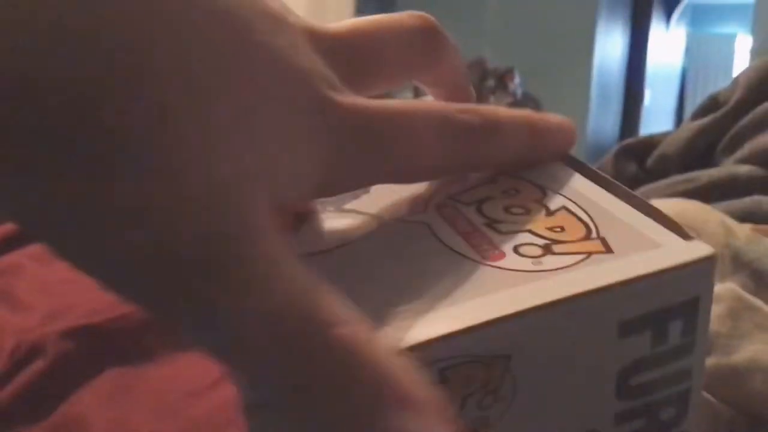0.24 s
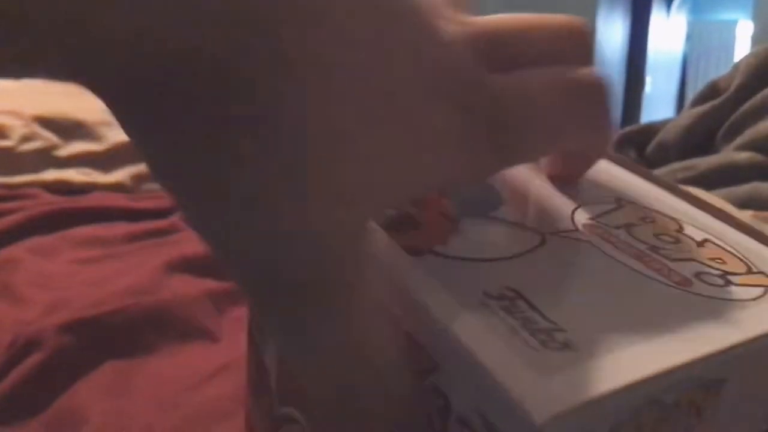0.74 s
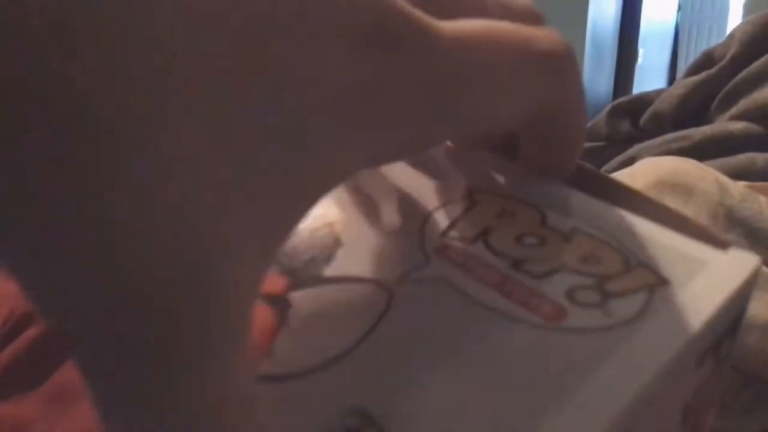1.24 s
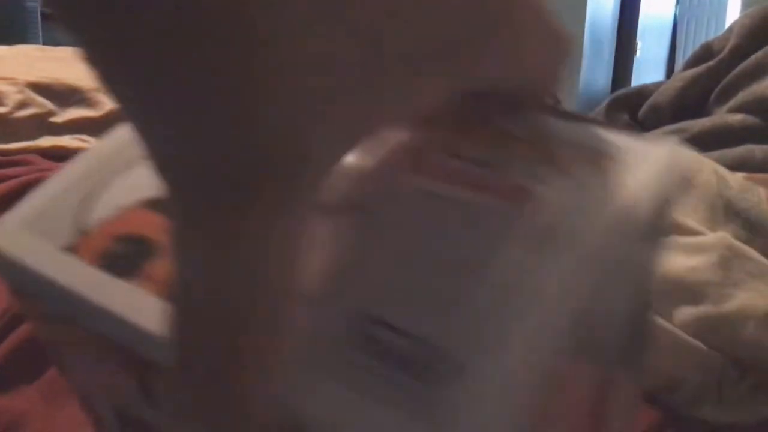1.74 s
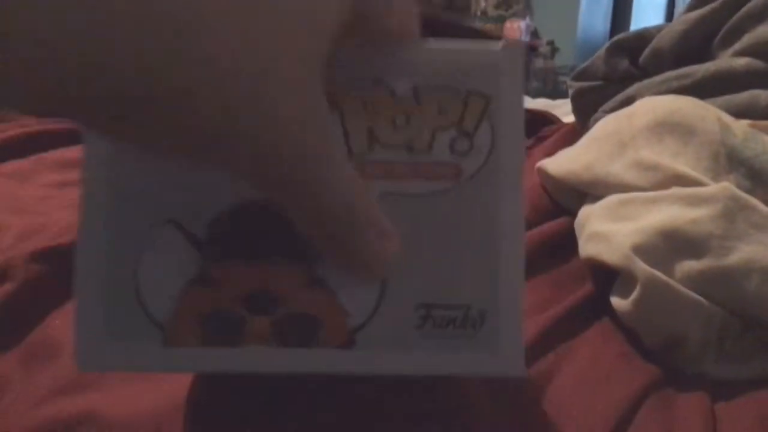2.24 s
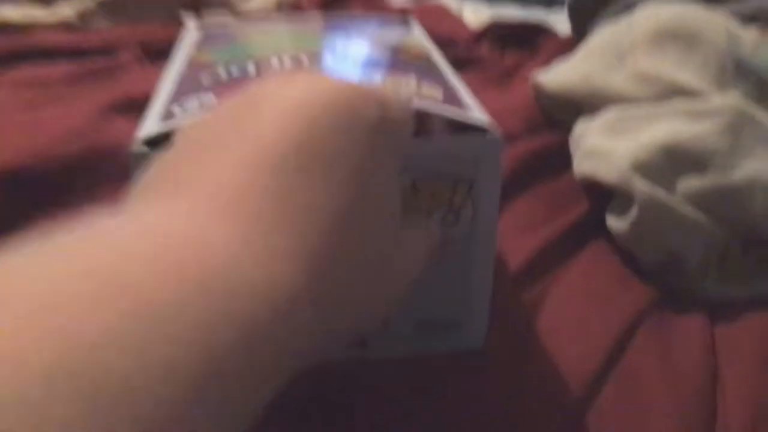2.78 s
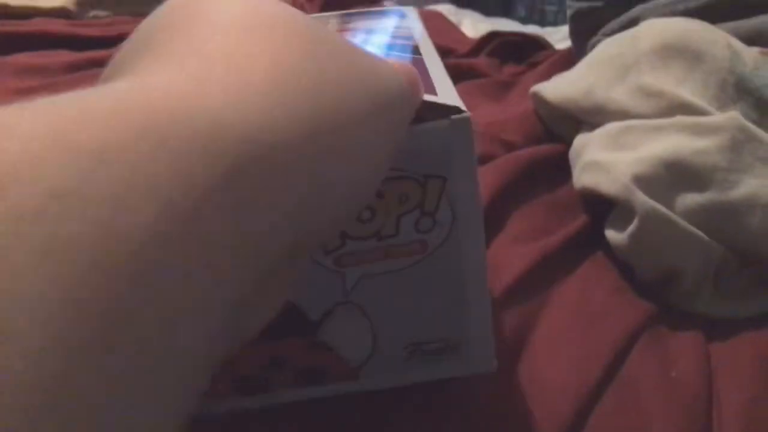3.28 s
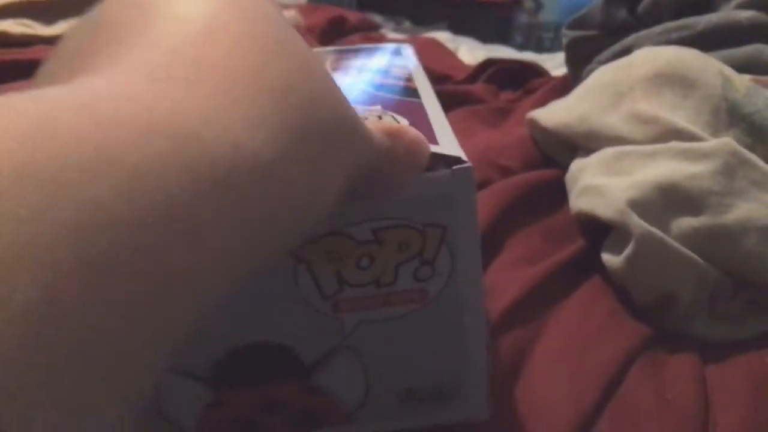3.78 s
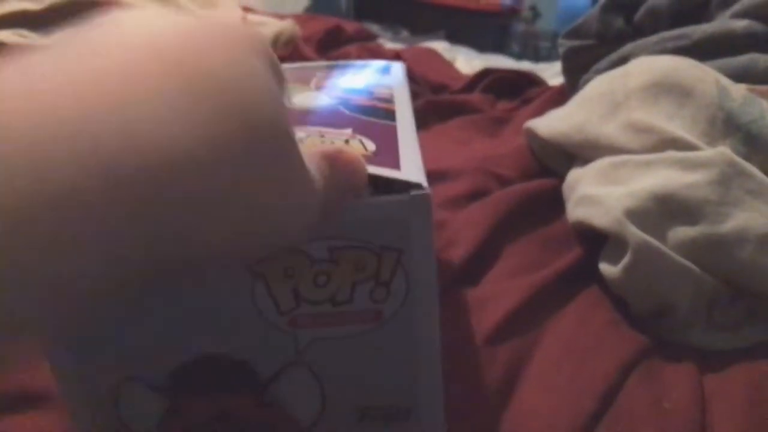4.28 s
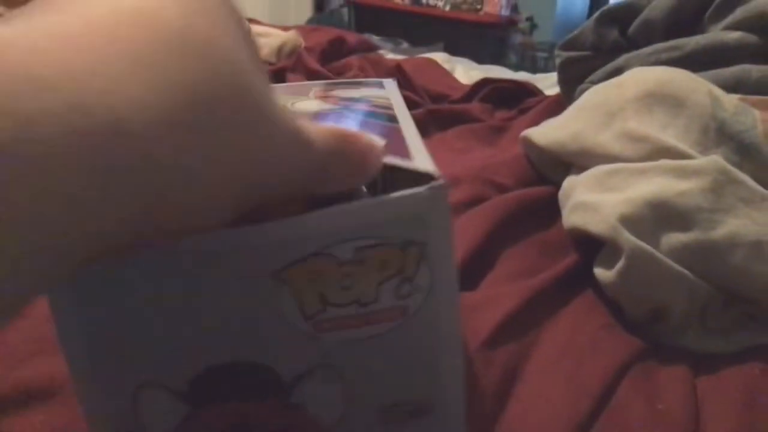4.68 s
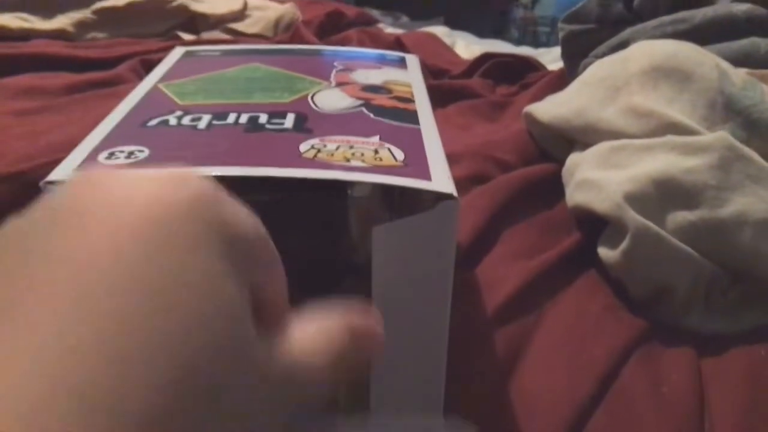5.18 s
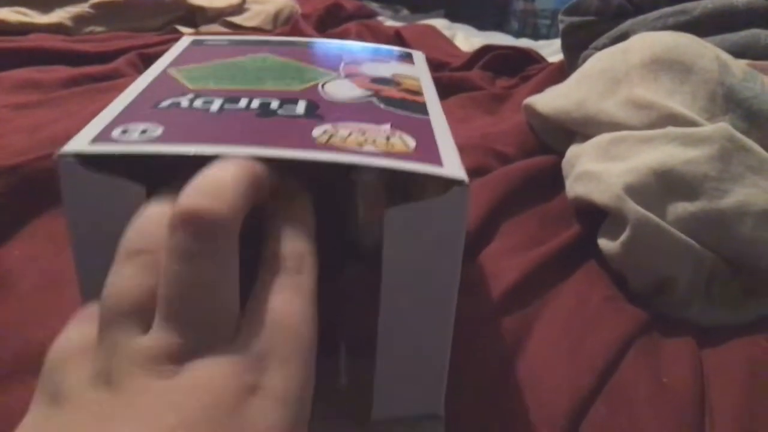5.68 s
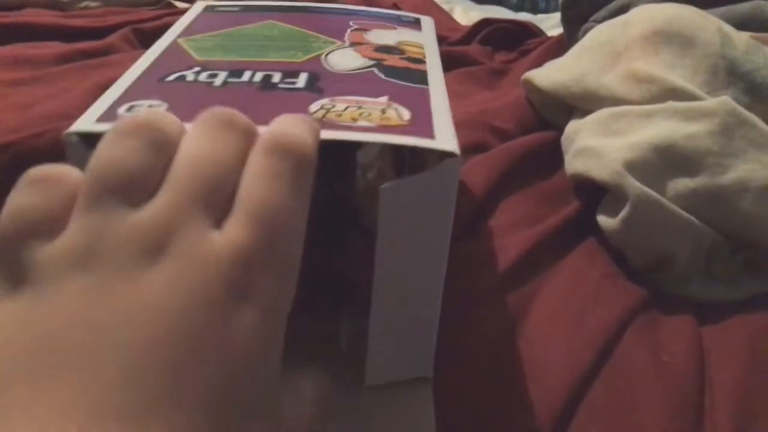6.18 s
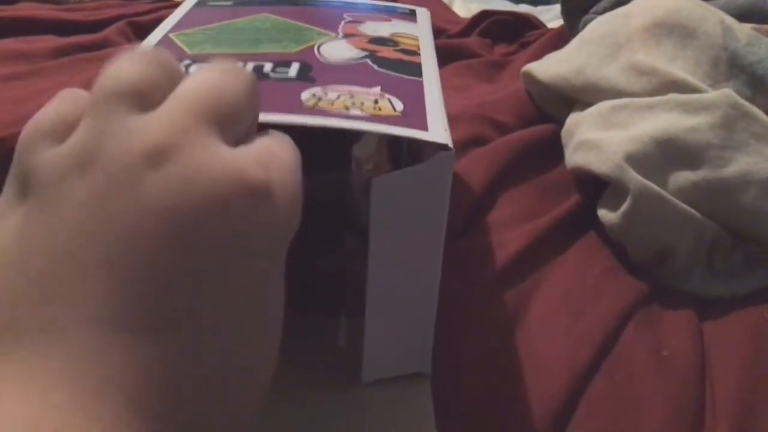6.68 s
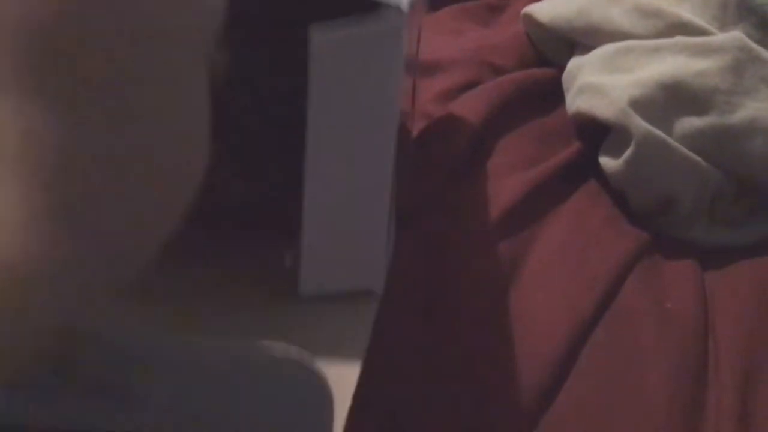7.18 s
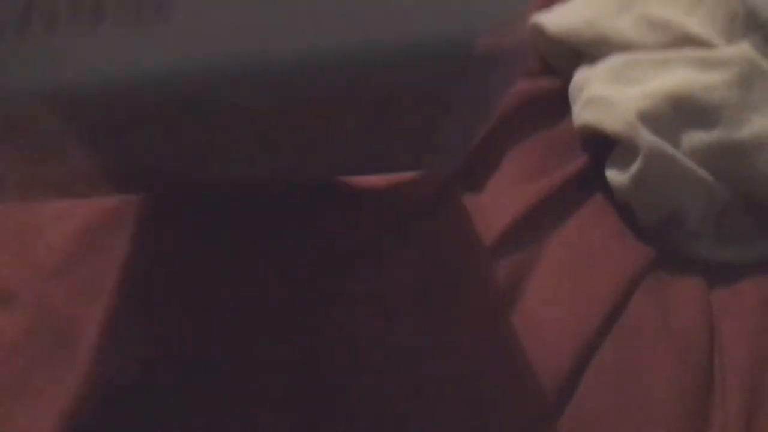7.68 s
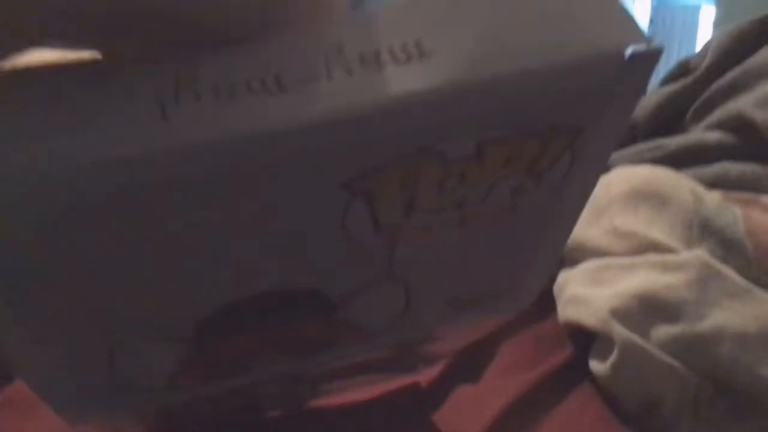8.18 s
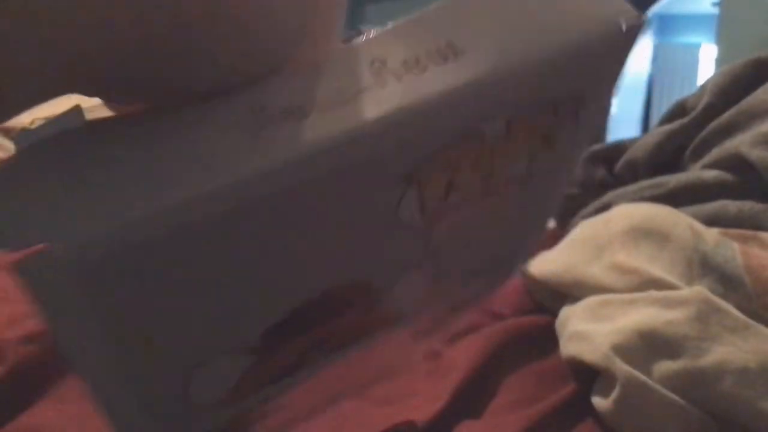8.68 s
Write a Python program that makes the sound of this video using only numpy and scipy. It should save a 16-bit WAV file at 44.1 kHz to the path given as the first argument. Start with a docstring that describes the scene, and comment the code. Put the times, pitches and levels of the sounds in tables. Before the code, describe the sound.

Fingers rustle lightly on a small cardboard box, then work at its flaps, which creak and scrape amid clicks and hollow pops. About halfway through comes one loud snap as the lid gives. After a short lull, the plastic tray inside is tugged with more crackling and creaking, ending in a strong pop and thump. It sounds close, in a quiet furnished room with a low hum.

```python
"""A hand turns and opens a small cardboard box on a bed and pulls at the plastic tray inside.
Over the hum of a quiet furnished room, fingers first rustle lightly on the card. From 1.5 s flaps
creak by stick-slip friction, creases and plastic snap, panels buckle with a pop, and the hollow box
resonates under the grip. The loudest snap comes at 4.7 s and a short lull follows; from 5.4 s the
handling resumes, to end on a strong pop and thump at 8.9 s."""
import sys
import numpy as np
from scipy import signal
from scipy.fft import rfft, irfft, next_fast_len
from scipy.io import wavfile
from scipy.ndimage import map_coordinates

SR = 44100
rng = np.random.default_rng(int(sys.argv[2]) if len(sys.argv) > 2 else 0)


def wav_record(signal):
    """Record a signal, one row per channel, as 16-bit PCM in the file named by sys.argv[1]."""
    frames = np.transpose(np.atleast_2d(signal))
    bounded = np.clip(frames, -1, 1)
    # unit amplitude maps onto the largest positive 16-bit level
    quanta = np.round(bounded * 32767).astype(np.int16)
    wavfile.write(sys.argv[1], SR, quanta)


N = 393813

# Room noise. Each row: frequency in Hz, relative spectral level in dB.
ROOM_SPECTRUM = [(18, -50.5), (30, -25), (41, -14.5), (70, 3), (131, -26), (245, -17.5), (287, -19.5),
                 (9220, -50), (16000, -59.5)]
# Broad spectrum of a slip or snap. Each row: frequency in Hz, relative spectral level in dB.
SLIP_SPECTRUM = [(410, -23), (700, 5.5), (830, 0), (2270, -12.5), (3940, -9.5), (16000, -23.5)]
# Panel resonances. Each row: frequency in Hz, bandwidth in Hz, gain in dB.
PANEL_MODES = [(1327, 110, -14.5), (1760, 530, -14.5), (2430, 140, -7.5), (3460, 620, -17.5),
               (4720, 300, -16), (7240, 2300, -14.5)]
# Resonances of the box's air and walls. Each row: frequency in Hz, bandwidth in Hz, gain in dB.
BOX_MODES = [(167, 130, -5), (295, 162, -1.5), (565.6, 152, 1.5), (770, 326, -10.5), (1490, 74, -9)]
# Damping in card. Each row: band centre in Hz, 60 dB decay time in seconds before decay_scale.
CARD_DAMPING = [(800, 0.1), (1800, 0.027), (4000, 0.028), (9000, 0.032), (15000, 0.0027)]
# The sheet being worked. Each row: start in seconds, first resonance in Hz, its gain in dB,
# second resonance in Hz, its gain in dB, treble tilt in dB per octave.
SHEET_COLOURS = [(0, 2840, -12, 2000, -19, 0), (1.45, 3920, 2.5, 3020, -5.5, 0.5),
                 (1.95, 2530, 8, 1610, -3, 0), (3.06, 4370, 0, 2680, -5, 1.5),
                 (3.45, 4400, -6, 2580, -1.5, .5), (4.1, 2680, 0, 4600, -4, -0.5),
                 (4.33, 2590, 12, 1530, 6, 2), (4.71, 4650, -2.5, 2585, -3, -1.5),
                 (4.79, 3070, 4.5, 6800, -6.5, -1), (4.87, 2270, 11, 3600, -3, -1),
                 (5.3, 1476, -4, 2980, -9, 0), (5.47, 5830, -5, 1370, -6, 0.5),
                 (5.9, 1950, 5.5, 1195, 5, 0), (6.3, 6800, 0, 4800, -17, 0.5),
                 (6.76, 3480, -5, 4480, -3, 1.5), (7.3, 3420, 6.5, 2160, 4.5, -1),
                 (7.75, 3430, 6, 5600, 1, 0.5), (8.5, 4200, 5.5, 900, -3.5, 1)]
# The hand's light touch. Each row: time in seconds, level of the box's drone in dB.
GRIP_LEVELS = [(0.0, -54), (0.35, -66.5), (1.51, -45), (1.71, -37), (2.26, -50.5), (2.74, -48.5),
               (2.93, -55.5), (4.78, -44.5), (4.951, -62), (5.47, -68.5), (5.62, -57), (6.219, -46),
               (6.37, -53.5), (7.11, -41.5), (7.36, -53), (7.76, -51), (8.159, -61), (8.93, -48.5)]
# Flaps and tray dragging. Each row: start in seconds, length in seconds, base creak level in dB,
# base drone level in dB.
DRAGS = [(0.037, 0.54, -64, -59.5), (0.545, 0.19, -57, -51.5), (0.745, 0.14, -55, -48.5),
         (0.918, 0.15, -63, -52), (1.497, 0.052, -49.5, -35.5), (1.533, 0.1144, -39, -37.5),
         (1.738, .032, -38, -34), (1.826, 0.054, -46, -37.5), (1.913, 0.161, -52, -41.5),
         (2.147, 0.084, -42, -40.5), (2.345, .12, -47.5, -46), (2.504, .269, -45.5, -48),
         (2.74, 0.17, -50.5, -45.5), (3.093, 0.16, -74.5, -46.5), (3.253, 0.13, -43, -43),
         (3.46, 0.049, -60, -53), (3.524, .208, -47.5, -44.5), (3.91, 0.12, -46.5, -41),
         (4.086, 0.029, -46.5, -32), (4.172, 0.12, -44.5, -44.5), (4.286, 0.081, -52.5, -75),
         (4.405, 0.085, -42.5, -39), (4.552, 0.057, -57, -37), (4.694, 0.07, -39, -29),
         (4.719, 0.034, -29, -22), (4.738, 0.082, -44.5, -33.5), (4.828, 0.028, -42, -44),
         (4.866, 0.066, -52.5, -41), (4.899, 0.0085, -43, -49), (4.954, 0.035, -62, -56),
         (5.42, 0.043, -58, -53), (5.493, 0.099, -54.5, -45.5), (5.591, 0.093, -44, -41),
         (5.704, 0.051, -37.5, -29.5), (5.76, 0.028, -58, -37.5), (5.881, 0.091, -62.5, -49),
         (6.035, 0.034, -36.5, -33.5), (6.073, 0.051, -37, -32.5), (6.136, 0.068, -37.5, -36),
         (6.62, 0.031, -52.5, -38.5), (6.767, 0.047, -67, -56), (7.235, 0.071, -39, -33.5),
         (7.435, 0.015, -57.5, -46.5), (7.543, 0.084, -58, -46), (7.639, 0.063, -43, -37.5),
         (7.833, 0.02, -48.5, -45), (7.924, 0.036, -52, -41), (8.059, .055, -45, -46),
         (8.119, 0.033, -60, -61.5), (8.901, 0.078, -44.5, -55)]
# Creases and plastic letting go. Each row: start in seconds, peak level in dB.
CREASE_SNAPS = [(0.146, -38), (0.627, -34.5), (0.805, -34.5), (0.9523, -42.5), (1.5018, -30), (1.5234, -28),
                (1.5396, -21.5), (1.6394, -27), (1.6659, -21), (1.7116, -38), (1.7459, -26),
                (1.7741, -30.5), (1.7878, -32), (1.8057, -28), (1.8282, -24), (1.9332, -24.5),
                (1.9642, -24.5), (2.0121, -22), (2.297, -26), (2.3567, -34), (2.4354, -36), (2.449, -22.5),
                (2.4969, -28), (2.584, -25), (2.6534, -28.5), (2.6711, -19), (2.8101, -31), (2.8222, -27),
                (2.8545, -30), (2.8942, -29), (2.9677, -32), (3.016, -28.5), (3.097, -36), (3.111, -26.5),
                (3.1542, -32.5), (3.1766, -28), (3.2108, -30), (3.2249, -29), (3.7499, -32.5),
                (3.8566, -34.5), (3.8817, -44), (3.901, -32), (4.0878, -30), (4.1591, -35.5),
                (4.1779, -31.5), (4.3243, -42), (4.3466, -27), (4.3744, -37.5), (4.3992, -28.5),
                (4.496, -28.5), (4.5251, -24.5), (4.5496, -32), (4.5569, -26), (4.578, -24), (4.6126, -32),
                (4.6315, -30), (4.6471, -24.5), (4.683, -23), (4.7213, 0.5), (4.7392, -6.5), (4.861, -29),
                (4.8801, -28), (4.8943, -27), (4.947, -34), (5.449, -21), (5.5006, -30), (5.5176, -25),
                (5.582, -26), (5.5996, -25), (5.6148, -19.5), (5.6273, -27), (5.646, -21.5), (5.661, -23.5),
                (5.7099, -35), (5.7401, -16.5), (5.914, -30.5), (5.9406, -38), (6.0118, -26),
                (6.0243, -23.5), (6.0791, -22), (6.1447, -36), (6.2168, -29.5), (6.2482, -22.5),
                (6.396, -21), (6.5494, -33.5), (6.6069, -24), (6.632, -23), (6.648, -27), (6.6716, -23),
                (6.6813, -20.5), (6.7533, -25.5), (6.7741, -35), (6.783, -25.5), (6.796, -24),
                (6.8416, -45), (6.8585, -33), (6.8778, -22), (6.9077, -29.5), (6.9346, -23.5),
                (6.9624, -38.5), (6.976, -30), (7.0095, -31.5), (7.0353, -17.5), (7.0586, -35.5),
                (7.093, -25.5), (7.1314, -29.5), (7.1428, -29.5), (7.1624, -26.5), (7.1926, -23),
                (7.236, -22.5), (7.2599, -17.5), (7.3891, -39.5), (7.4724, -21), (7.6241, -22.5),
                (7.647, -28), (7.7109, -24), (7.7978, -23), (7.8159, -28), (7.856, -33), (7.9166, -44),
                (7.9479, -39), (7.9643, -29), (8.0272, -31), (8.0694, -29.5), (8.109, -31), (8.2808, -30),
                (8.3292, -22), (8.4858, -28.5), (8.5236, -29.5), (8.543, -28.5), (8.5977, -23),
                (8.6296, -28.5), (8.6567, -26.5), (8.7016, -30), (8.7538, -26.5), (8.778, -40),
                (8.8714, -34.5), (8.8889, -23), (8.904, -30.5), (8.913, -26.5), (8.9231, -15)]
# Panels buckling. Each row: start in seconds, peak level in dB, pitch in Hz,
# the box's thump in dB relative to the pop.
PANEL_POPS = [(0.124, -36, 460, -31), (0.685, -32.5, 556, -22.5), (0.785, -37.5, 560, 4),
              (1.234, -24, 480, -13), (1.297, -34, 603, -22), (1.333, -24.5, 490, -13),
              (1.529, -19, 520, -15), (1.555, -12, 420, -40), (1.717, -16.5, 567, -5),
              (1.864, -18.5, 520, -13.5), (2.22, -12.5, 751, -11.5), (2.444, -36, 604, -8),
              (2.585, -20, 588, -39), (2.668, -21.5, 720, -9), (2.691, -23.5, 806, -5),
              (2.893, -25, 533, -17), (3.227, -27, 370, -13), (3.394, -34.5, 410, -4),
              (4.008, -14, 460, -13.5), (4.093, -16, 524, -12.5), (4.644, -23.5, 530, -37),
              (4.702, -12.5, 553, -30), (4.719, -3, 475, -11), (4.736, -3.5, 780, -4.5),
              (5.449, -25.5, 247, -3), (5.712, -11, 604, -34), (5.744, -17, 541.3, -7),
              (6.055, -16, 480, -11), (6.109, -8.5, 810, -17), (6.175, -15.5, 583, -17),
              (6.248, -24, 670, -11.5), (6.317, -33.5, 520, -8), (6.387, -31, 590, -13),
              (6.52, -31, 503, -7), (6.68, -24.5, 496, -14), (6.752, -29.5, 667, -28),
              (6.79, -25, 724, -10), (7.193, -27, 505, -22), (7.255, -16, 556.4, -4),
              (7.473, -25, 682, -30), (7.796, -30.5, 549.5, -16), (7.84, -18.5, 530, -33),
              (7.933, -22.5, 464, -28), (8.334, -33, 670, -34), (8.543, -31.5, 920, -30),
              (8.629, -33.5, 655, -30), (8.657, -37, 660, -28), (8.92, -4.5, 688, 4)]

ROOM_DB, ECHO_DB, RUSTLE_DB, RUMBLE_DB = -58.5, -22, -63, -58.5  # the last two at average grip
USUAL_CREAK_DB, USUAL_SLIPS_PER_S, SPOTS_PER_S = -45, 110, 40
ATTACK_S, SLIDE_ATTACK_S, CREAK_T60_S, DRONE_T60_S = 0.0063, 0.03, 0.02, 0.053


def amp(db):
    """Decibels as an amplitude ratio."""
    return 10 ** (np.asarray(db) / 20)


def unit_rms(x):
    """A signal scaled to unit power."""
    return x / np.sqrt(np.mean(x ** 2) + 1e-20)


def unit_peak(x):
    """Each row scaled to a peak of one."""
    return x / np.abs(x).max(axis=1, keepdims=True)


def wobble(rate):
    """A smooth random modulation with rate knots a second."""
    return map_coordinates(rng.standard_normal(int(N * rate / SR) + 4), [np.arange(N) * rate / SR])


def decay(t, t60, rise_s):
    """Damping: an exponential fall after a quick rise."""
    return amp(-60 * t / t60) * (1 - np.exp(-t / rise_s))


def place(times, sounds):
    """Superposition: the sounds add, each from its own start."""
    track = np.zeros(N + SR)
    for start, x in zip(times, sounds):
        track[round(start * SR):][:len(x)] += x
    return track[:N]


def filtered(x, response):
    """Linear filtering: the spectrum is multiplied by a frequency response."""
    n = x.shape[-1]
    padded = next_fast_len(n + 4096)
    return irfft(rfft(x, padded) * response(np.fft.rfftfreq(padded, 1 / SR)), padded)[..., :n]


def spectrum(f, points):
    """A spectral envelope: decibels interpolated over log frequency, as gain."""
    hz, db = np.transpose(points)
    return amp(np.interp(np.log(f + 1), np.log(hz + 1), db))


def resonance(f, hz, width):
    """The response of a damped oscillator, unity at its natural frequency."""
    return 1j * f * width / (hz * hz - f * f + 1j * f * width)


def modes(f, table):
    """Modal summation: resonances add with alternating sign."""
    return sum((-1) ** k * amp(db) * resonance(f, hz, width) for k, (hz, width, db) in enumerate(table))


def bending(f, spread):
    """Dispersion: high bending waves travel faster, so the treble arrives first."""
    return np.exp(-1j * spread * (np.sqrt(f) - f / np.sqrt(SR * 2)))


def card_colour(f):
    """Panel resonances stand out from the broad spectrum of a slip."""
    return spectrum(f, SLIP_SPECTRUM) * (1 + 2 * np.abs(modes(f, PANEL_MODES)))


def treble_tilt(f, db_per_octave):
    """A spectral slope above 1 kHz, pivoting at 3 kHz."""
    return amp(db_per_octave * np.log2(np.maximum(f, 1000) / 3000))


def row_at(table, time):
    """The values of the row in force at each time."""
    starts, *columns = np.transpose(table)
    row = np.maximum(np.searchsorted(starts, time) - 1, 0)
    return [column[row] for column in columns]


def sheet_colour(f, time, detune=0):
    """Local resonance: the moving patch of sheet rings at two frequencies."""
    first_hz, first_db, second_hz, second_db, tilt_db = row_at(SHEET_COLOURS, time)
    rings = [(first_hz * np.exp(detune), first_db), (second_hz * np.exp(-detune), second_db)]
    ringing = sum(amp(db) * resonance(f, hz, width=0.069 * hz) for hz, db in rings)
    return (1 + ringing) * treble_tilt(f, tilt_db)


def card_bursts(count, decay_scale):
    """Frequency-dependent damping: noise bursts in card lose their highest band first."""
    t = np.arange(SR // 16) / SR
    noise = rng.standard_normal((count, len(t)))
    bursts = 0
    for hz, t60 in CARD_DAMPING:
        band = filtered(noise, lambda f: np.exp(-(np.log((f + 1) / hz) / 0.97) ** 2) * card_colour(f))
        bursts += band * decay(t, decay_scale * t60, rise_s=0.00033)
    return filtered(bursts, lambda f: bending(f, 0.5))


def slips(rate, spread_db):
    """Stick-slip friction: impulses at an uneven rate and of scattered size."""
    cycles = np.cumsum(rate / SR * amp(2.5 * wobble(30) + 1.5 * wobble(150)))
    released = np.diff(np.floor(cycles), prepend=0) > 0
    return released * amp(spread_db * rng.standard_normal(N)) * np.sign(rng.standard_normal(N))


def box_drone(shake):
    """Forced vibration: the air and walls of the box resonate with whatever shakes them."""
    return unit_rms(filtered(shake, lambda f: modes(f, BOX_MODES) / (1 + (f / 1100) ** 4)))


def room_hum():
    """Stationary noise: a low hum and a thin hiss."""
    return amp(ROOM_DB) * unit_rms(filtered(rng.standard_normal(N), lambda f: spectrum(f, ROOM_SPECTRUM)))


def room_echo(x):
    """Absorption by soft furnishings leaves a weak, short and dull reverberation."""
    t = np.arange(SR // 3) / SR
    tail = filtered(rng.standard_normal(len(t)), lambda f: 1 / (1 + f / 3000)) * amp(-60 * t / 0.32)
    return amp(ECHO_DB) * signal.fftconvolve(x, tail / np.linalg.norm(tail))[:N]


def handling():
    """Sliding friction: fingers rustle, the box drones and bedding rumbles, all following the grip."""
    drone_db = np.interp(np.arange(N) / SR, *np.transpose(GRIP_LEVELS))
    grip_db = drone_db - drone_db.mean()
    surge = wobble(25)
    flutter = amp(2 * surge + 1.5 * wobble(6))
    friction = rng.standard_normal(N) + 0.15 * unit_rms(slips(60, spread_db=6))
    rustle = flutter * filtered(friction, card_colour)
    drone = box_drone(amp(2.5 * surge + 2.5 * wobble(40)) * rng.standard_normal(N))
    jostle = amp(3 * wobble(15)) * rng.standard_normal(N)
    rumble = filtered(jostle, lambda f: resonance(f, hz=95, width=90) ** 2 * f / (f + 60))
    return (amp(RUSTLE_DB + 0.79 * grip_db) * unit_rms(rustle) + amp(drone_db) * drone
            + amp(RUMBLE_DB + 0.25 * grip_db) * unit_rms(rumble))


def slip_ticks(spot_count=12):
    """Stick-slip quickens with the pull; each spot that slips has its own impulse response."""
    _, creak_db, _ = row_at(DRAGS, np.arange(N) / SR)
    pulses = slips(USUAL_SLIPS_PER_S * amp(0.55 * (creak_db - USUAL_CREAK_DB)), spread_db=3)
    spot = rng.integers(spot_count, size=N)[np.arange(N) * SPOTS_PER_S // SR]
    rings = card_bursts(spot_count, decay_scale=0.55)
    return unit_rms(sum(signal.fftconvolve(pulses * (spot == k), x)[:N] for k, x in enumerate(rings)))


def flap_creaks():
    """Friction between flaps and tray excites the sheet and the box, in separate slips or as a rasp."""
    ticks = slip_ticks()
    rasp = unit_rms(amp(3 * wobble(90) + 2 * wobble(25)) * filtered(rng.standard_normal(N), card_colour))
    flutter = amp(3.2 * wobble(40))
    drone = box_drone(flutter * (unit_rms(slips(200, spread_db=3.5)) + rng.standard_normal(N)))
    sounds = []
    for start, length, creak_db, drone_db in DRAGS:
        first = round(start * SR)
        span = slice(first, first + round((length + 0.076) * SR))
        t = np.arange(len(ticks[span])) / SR
        since_stop = np.maximum(t - length, 0)
        # Lighter drags slide and harder ones blur: both turn ticks into rasp.
        rasp_share = min(0.1 + 0.04 * abs(USUAL_CREAK_DB - creak_db), 1)
        friction = np.sqrt(1 - rasp_share) * ticks[span] + np.sqrt(rasp_share) * rasp[span]
        creak = filtered(friction, lambda f: sheet_colour(f, start))
        creak *= amp(creak_db - 60 * since_stop / CREAK_T60_S)
        box = drone[span] * amp(drone_db - 60 * since_stop / DRONE_T60_S)
        attack = np.minimum(t / (ATTACK_S + SLIDE_ATTACK_S * rasp_share ** 3), 1)
        arch = np.sin(np.pi * np.minimum(t / length, 1) ** 1.6)  # peaks after the middle
        swell_db = (1.5 + 2 * rasp_share) * arch
        sounds.append(attack * amp(swell_db) * (creak + box))
    return place([row[0] for row in DRAGS], sounds)


def panel_pops():
    """Buckling: a panel flips and rings for a few cycles; the whole box thumps after it."""
    start, db, hz, thump_db = np.transpose(PANEL_POPS)[:, :, None]
    t = np.arange(SR // 5) / SR
    push = rng.standard_normal((len(start), len(t))) * decay(t, t60=0.041, rise_s=0.0005)
    tone = lambda f: (0.35 / 0.39 * resonance(f, hz, width=0.39 * hz)) ** 2
    box = lambda f: 0.62 * modes(f, BOX_MODES) / (1 + (f / 2300) ** 2)
    pop = filtered(push, lambda f: bending(f, 1.1) * (tone(f) + box(f)))
    shove = rng.standard_normal(push.shape) * decay(t, t60=0.083, rise_s=0.0048)
    bass = lambda f: amp(-2) * resonance(f, hz=80, width=60) - resonance(f, hz=200, width=120)
    thump = filtered(shove, lambda f: bending(f, 1.5) * bass(f) / (1 + (f / 320) ** 4))
    return place(start[:, 0], (unit_peak(pop) + amp(thump_db) * unit_peak(thump)) * amp(db))


def crease_snaps():
    """Impulsive excitation: creases and plastic let go at once, each a little duller or brighter."""
    start, db = np.transpose(CREASE_SNAPS)[:, :, None]
    detune, tilt_db = np.split(rng.normal(scale=[0.015, 1.5], size=(len(start), 2)), 2, axis=1)
    bursts = card_bursts(len(start), decay_scale=0.57)
    snaps = filtered(bursts, lambda f: sheet_colour(f, start, detune) * treble_tilt(f, tilt_db))
    return place(start[:, 0], unit_peak(snaps) * amp(db))


def scene():
    """Superposition: snaps, pops, creaks and their reverberation add to the handling and the hum."""
    direct = crease_snaps() + panel_pops() + flap_creaks()
    return (direct + room_echo(direct) + handling() + room_hum())[None]


def record(dry):
    """Saturation rounds the loudest peak; band limiting keeps 44 Hz to 15.9 kHz."""
    soft = dry / (1 + np.abs(dry / 0.95) ** 4) ** (1 / 4)
    return filtered(soft, lambda f: (f < 15900) / (1 + (44 / (f + 1)) ** 4))


dry = scene()
out = record(dry)
wav_record(out)
```